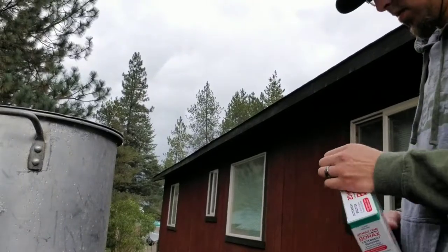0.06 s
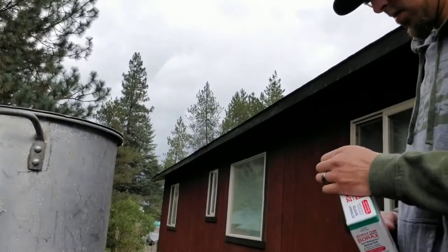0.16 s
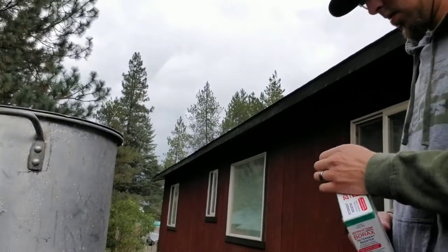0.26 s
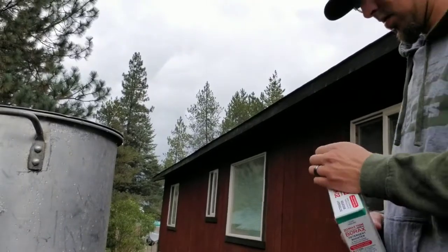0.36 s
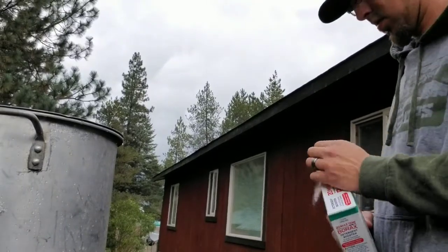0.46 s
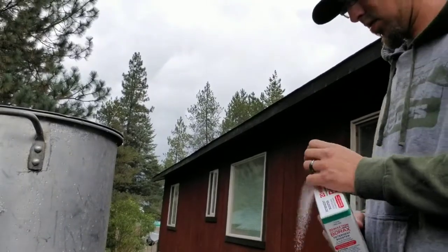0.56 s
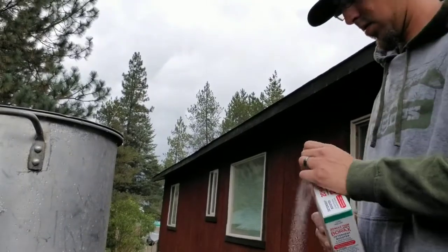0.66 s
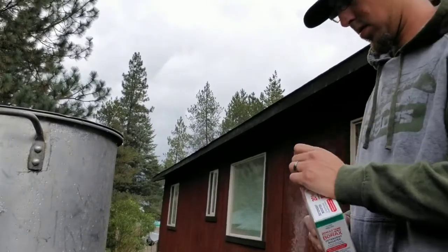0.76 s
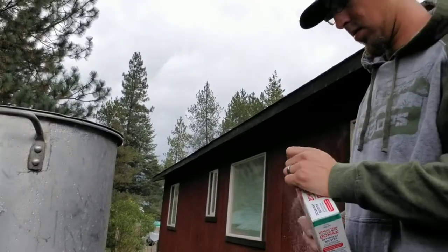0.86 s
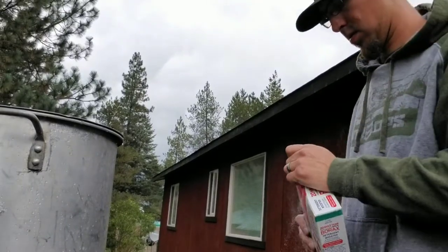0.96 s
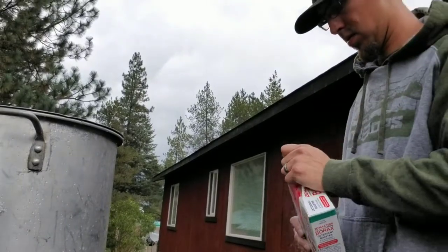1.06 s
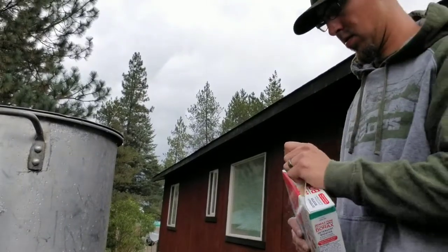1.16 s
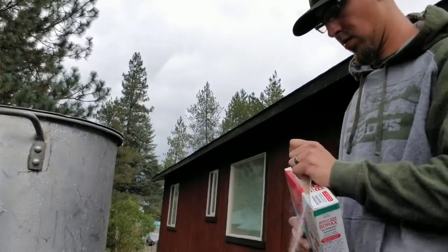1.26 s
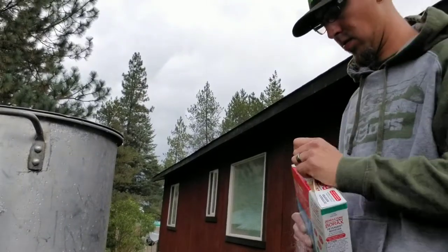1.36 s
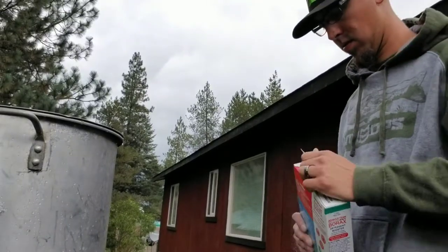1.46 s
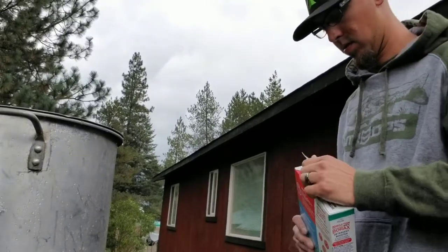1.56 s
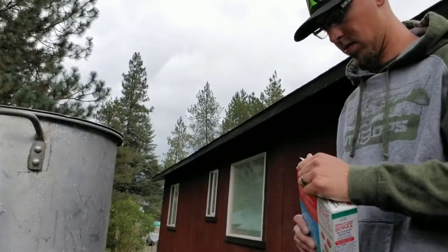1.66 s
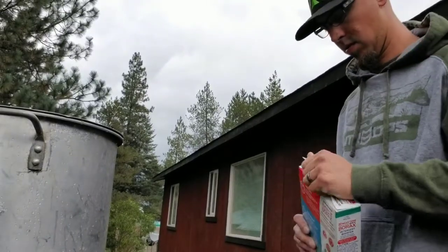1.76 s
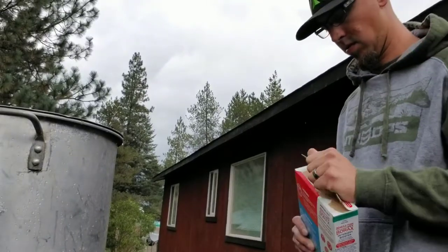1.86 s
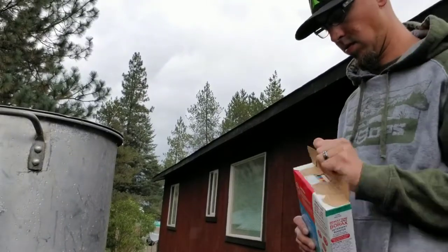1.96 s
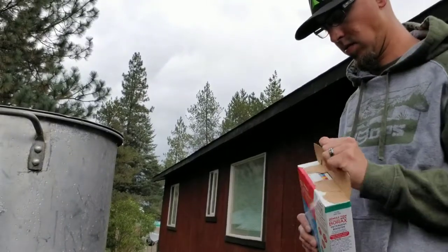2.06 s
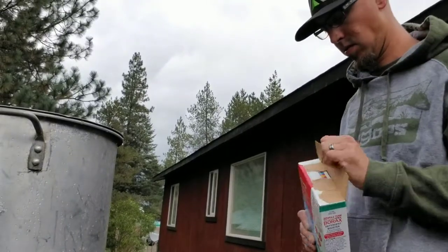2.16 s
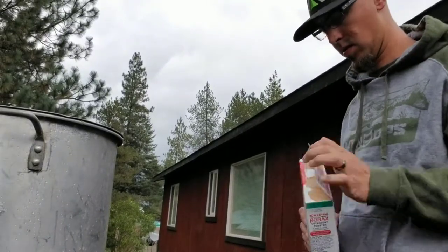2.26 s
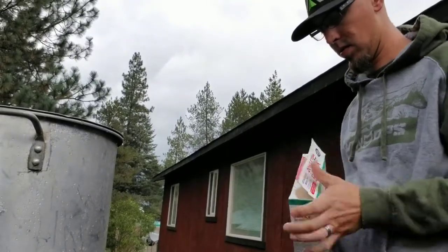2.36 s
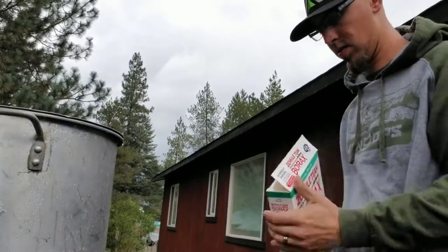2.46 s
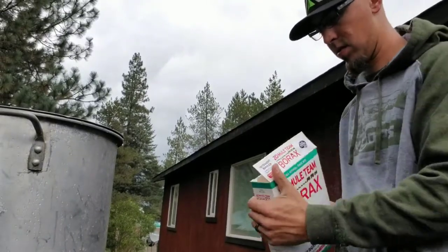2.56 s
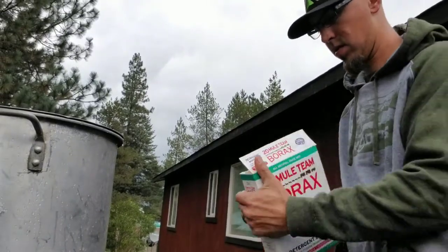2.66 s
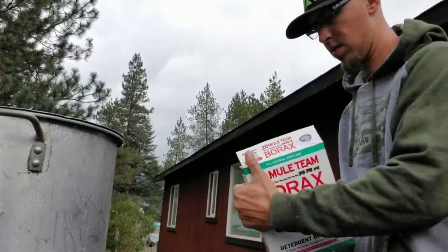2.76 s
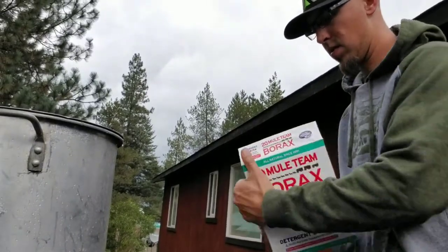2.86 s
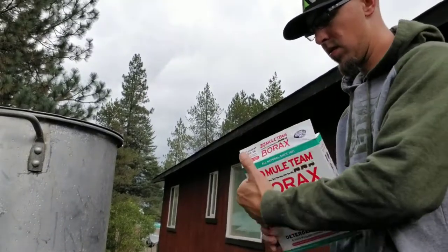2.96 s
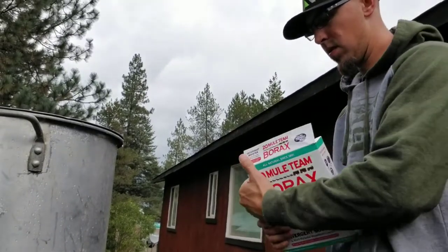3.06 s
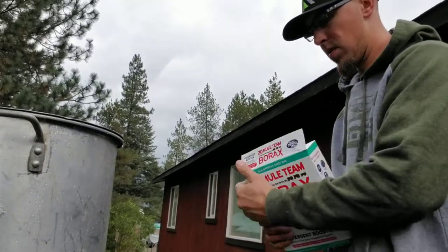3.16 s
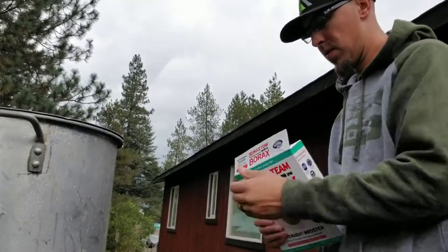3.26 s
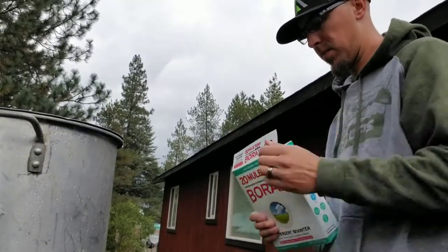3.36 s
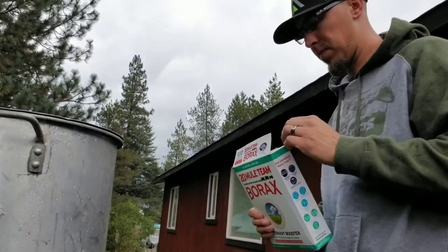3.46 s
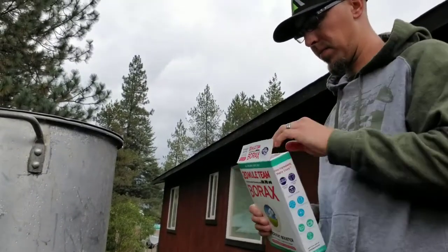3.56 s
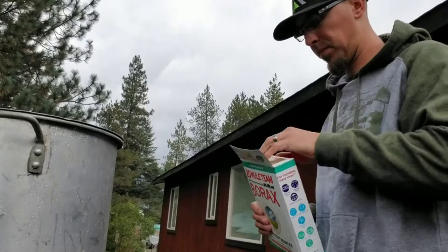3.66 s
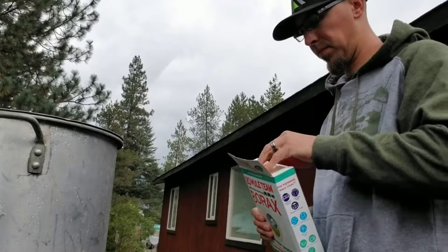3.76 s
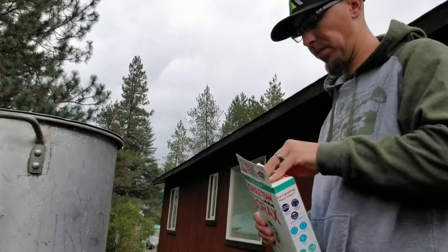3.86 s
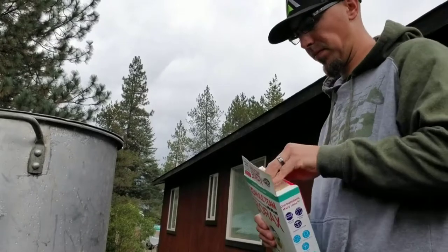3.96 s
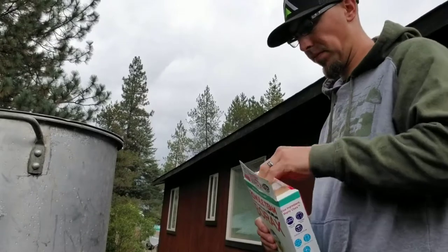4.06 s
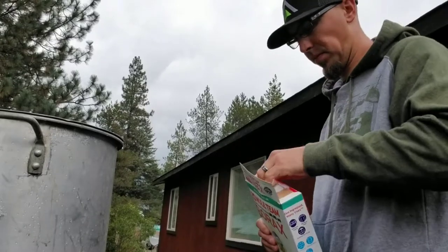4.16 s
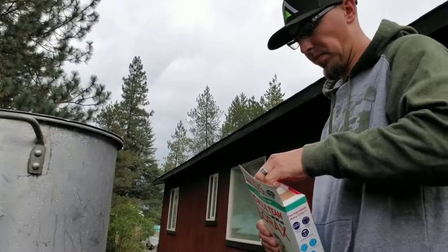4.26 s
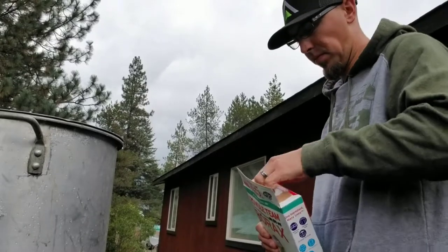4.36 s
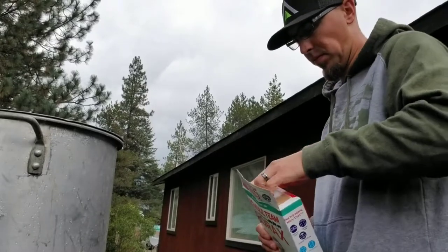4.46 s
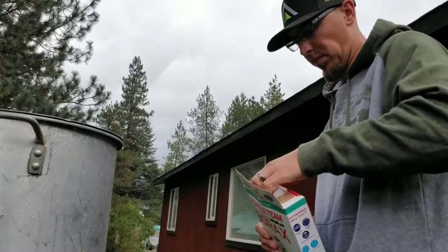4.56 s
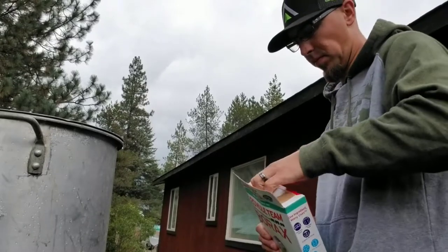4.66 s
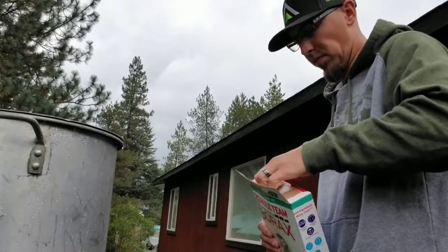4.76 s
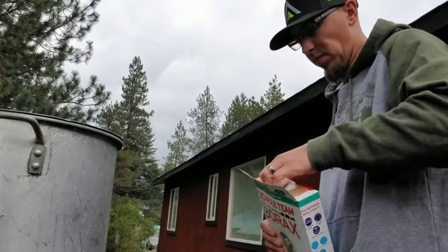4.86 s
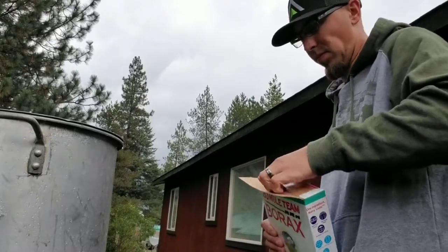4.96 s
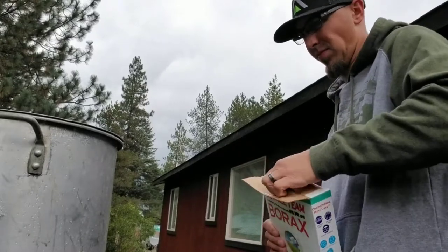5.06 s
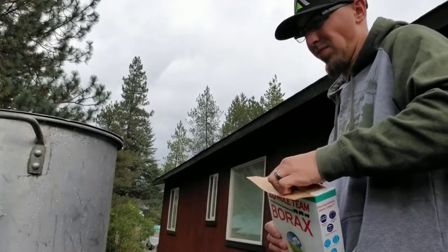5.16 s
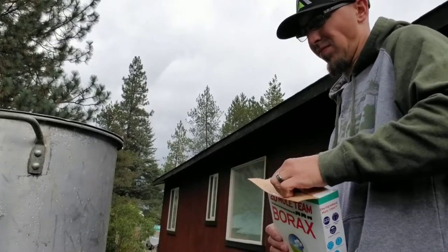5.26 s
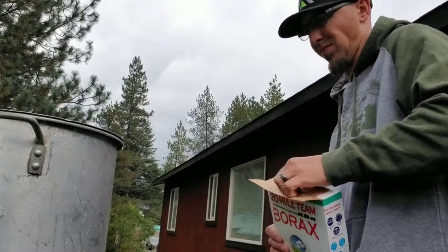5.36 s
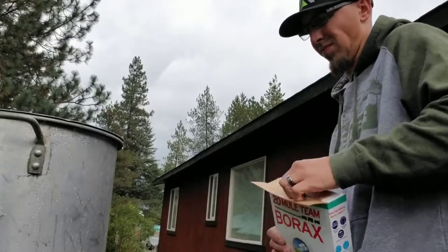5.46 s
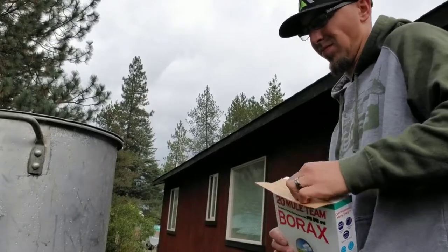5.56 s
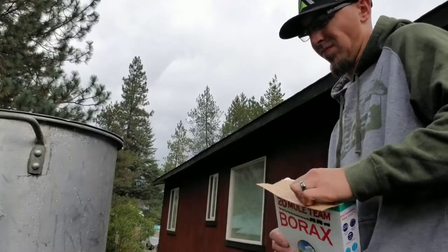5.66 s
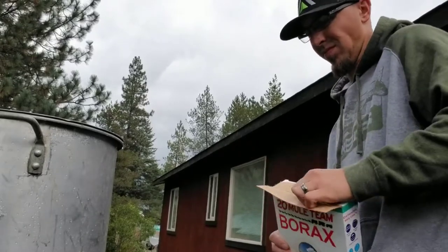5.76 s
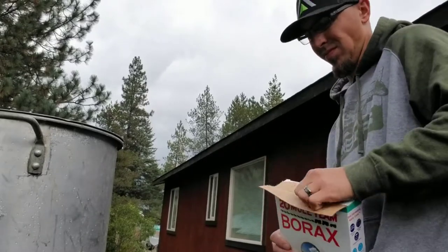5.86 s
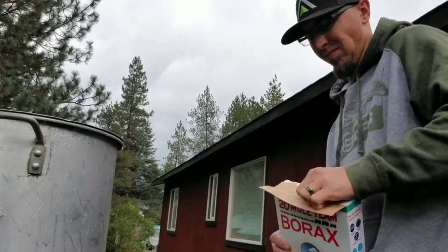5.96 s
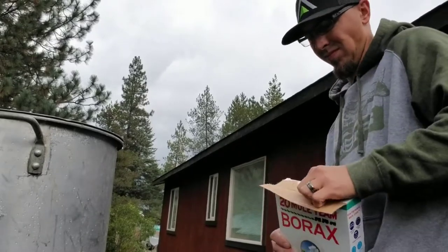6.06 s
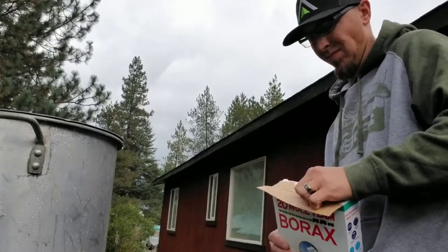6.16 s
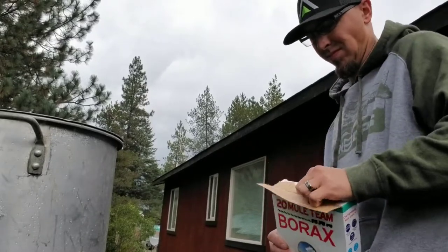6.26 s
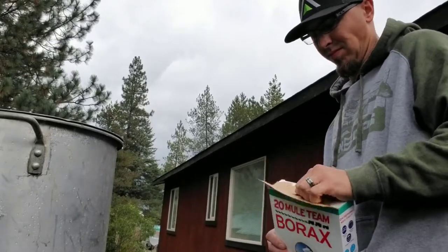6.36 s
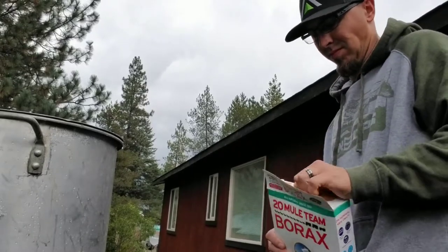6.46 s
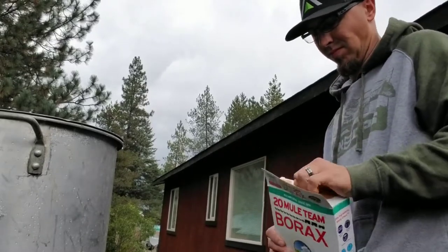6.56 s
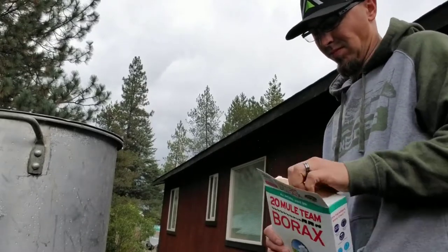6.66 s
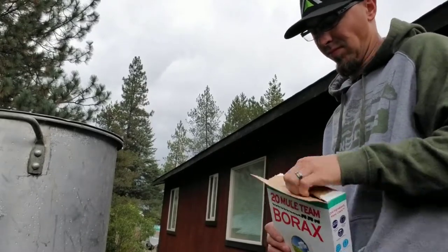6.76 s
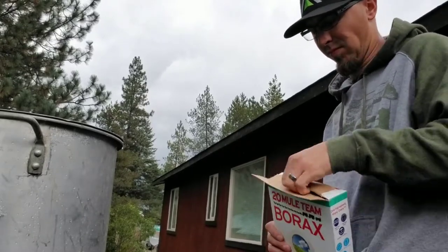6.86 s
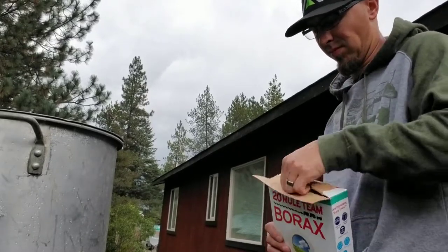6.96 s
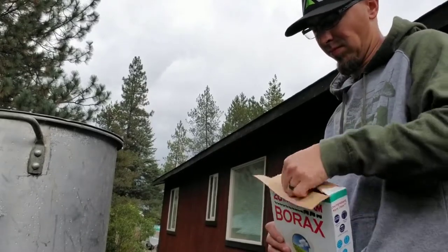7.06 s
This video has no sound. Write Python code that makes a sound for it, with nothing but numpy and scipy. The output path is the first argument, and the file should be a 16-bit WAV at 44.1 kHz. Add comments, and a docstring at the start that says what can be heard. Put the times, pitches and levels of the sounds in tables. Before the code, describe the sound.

Dry cardboard handling, heard near and with little echo outdoors. Crisp rubs and snapping creases come first, then a short coarse tear of glued board. Handling drops to sparse faint touches before renewed scratchy strokes on an inner flap. A low stuttering rub leads to a hard hollow pop, and light scrapes and bumps finish. Soft breeze rumble and faint simmering from a large metal pot continue beneath.

```python
"""In a yard beside a house a large metal pot simmers faintly, under a lumpy breeze, as a washing powder carton is handled.
From the start short friction strokes rub it: slips drive its stiff board, hollow box and hissing fibres.
Soon creases crack as decaying noise bursts and panels knock as short pushes that ring the box.
At 1.74 s the lid tears off its glue in one long rip; more strokes work the inner flap loose.
At 5.74 s a fingertip judders by stick-slip; from 6.48 s the flap pops through in loud knocks and cracks."""
import sys
import numpy as np
from scipy import signal
from scipy.io import wavfile

SR = 44100
rng = np.random.default_rng(int(sys.argv[2]) if len(sys.argv) > 2 else 0)


def wav_record(signal):
    """Record a signal, one row per channel, as 16-bit PCM in the file named by sys.argv[1]."""
    frames = np.transpose(np.atleast_2d(signal))
    bounded = np.clip(frames, -1, 1)
    # unit amplitude maps onto the largest positive 16-bit level
    quanta = np.round(bounded * 32767).astype(np.int16)
    wavfile.write(sys.argv[1], SR, quanta)


N = 313548
TIME = np.arange(N) / SR

# All levels are those at the source, before small trims and the yard's reflections.
# breeze on the microphone: start_s, level_db
BREEZE_CURVE = [(0.0, -61), (.4, -53), (1.05, -54.5), (1.4, -64), (3.9, -59.5), (4.4, -55.5), (5.5, -56),
                (6.2, -52), (6.9, -57), (7.11, -44.5)]
# resonances of the air in the pot: pitch_hz, width_hz, level_db
POT_MODES = [(610, 42, -11), (955.4, 35, 9), (2006, 140, -6.5), (2070, 170, -17.5), (2800, 140, -12),
             (4130, 500, -22)]
# boost of the pot's upper ring: start_s, gain_db
POT_UPPER_CURVE = [(0.0, 1), (2.5, -1), (2.6, 6.5), (7.11, 4)]
POT_UPPER_HZ, POT_UPPER_WIDTH_HZ = 1980, 450

# resonances of the hollow box: pitch_hz, width_hz, level_db
BOX_MODES = [(189.4, 76, -0.5), (273.7, 51.5, 2.5), (320.6, 24, 1), (467, 48, -1), (579, 99, -2.5),
             (627, 86, 0.5), (733, 77, -12), (860, 180, -7.5)]
# resonances of the stiff board: pitch_hz, width_hz, level_db
BOARD_MODES = [(734, 200, -5.5), (1460, 313, 0.5), (1633, 370, 3), (1842, 242, 3), (2171, 183, -2.5),
               (2530, 300, -1.5), (3220, 660, -2), (4044, 520, -0.5), (4550, 595, 1), (6290, 1700, -5.5)]
# freedom of the flap in hand, lifted to ring or pressed to damp: start_s, ring_db, pitch_hz
FLAP_CURVE = [(0.0, 2, 1680), (1.15, 0.5, 1660), (1.45, 6.5, 1770), (1.68, 5, 1660), (1.95, -0.5, 1760),
              (2.7, 6, 2080), (4.15, 4, 1980), (4.7, 8.5, 1970), (5.0, 5, 1910), (5.5, 6, 1790),
              (6.3, -2, 1760), (6.54, 5.5, 1980)]
FLAP_OCTAVES = .27   # spread of its bending modes around its pitch

# faint shifting of the hands between strokes, as scrape on the board: start_s, scrape_db
SHIFTING_CURVE = [(0.0, -55.5), (.8, -53), (1.35, -57.5), (1.7, -61), (2.12, -72), (2.38, -89),
                  (2.55, -63.5), (3.2, -72.5), (3.8, -65), (4.1, -55), (4.8, -54.5), (5.45, -62.5),
                  (6.3, -56), (7.11, -62)]
SHIFT_PUSH_DB, SHIFT_FIBRE_DB = -2.5, -5   # re scrape
SHIFT_WAVER_DB, SHIFT_WAVERS_PER_S = 1, 18
# a finger or flap slides over the carton:
# start_s, length_s, scrape_db, swell_db (start to end), push_db (box, re scrape), fibre_db (re scrape)
STROKES = [(0.0, .15, -57, 0, -4.5, 11), (0.139, 0.063, -41, 14, -19, -0.5),
           (0.256, 0.0904, -33, -7, -6, -5), (0.323, 0.096, -46, -10, -2, -7.5),
           (0.511, 0.28, -67.5, -8.5, 2.5, 8), (.648, 0.14, -43, -22.5, 1, -13.5),
           (0.853, 0.15, -45, 4, -10, 3), (0.965, .13, -37.5, -6, -9.5, 1.5),
           (1.12, 0.13, -47.5, -8.5, -7.5, 8), (1.4, 0.18, -50.5, -5, -3, -3),
           (1.586, 0.12, -57, 4, -17.5, -0.5), (2.182, 0.027, -48, -1, -9.5, -6),
           (2.419, .11, -59.5, 0, -4.5, -3.5), (2.731, .115, -63, 4, -5, -15),
           (3.623, 0.054, -51, 11, -11, -7), (3.85, 0.047, -54.5, -4, 1.5, -6),
           (3.998, 0.086, -54.5, -11, -2, -6), (4.084, 0.16, -43.5, -1.5, -32, -5),
           (4.345, 0.279, -43, -3.5, -14, -5), (4.629, 0.11, -41.5, -6, -40, -4.5),
           (4.885, 0.058, -46, 5, -7, -1.5), (4.948, 0.045, -40.5, -1.5, -1, 0),
           (5.007, 0.13, -55, -6.5, -19, -4.5), (5.193, .08, -63, 13.5, 12.5, -4.5),
           (5.352, .04, -50, 1.5, -1, -8), (5.612, 0.17, -63.5, -8.5, 9, 3.5),
           (5.746, .18, -48.5, 2, -5, -11.5), (5.956, 0.053, -46, -4.5, 0, -1),
           (6.123, .2, -56.5, -1.5, 7.5, -2), (6.325, 0.1, -46.5, 0.5, 3.5, -5),
           (6.428, 0.057, -42, 12.5, 0.5, 2.5), (6.53, 0.038, -37.5, -9, 1, -12),
           (6.569, 0.13, -64, 6, 13, -19), (6.728, 0.057, -55, 8.5, 1, -5),
           (6.852, 0.022, -49, -0.5, -3.5, -2.5), (6.939, 0.028, -54, 3, 1.5, -6.5),
           (7.021, 0.068, -52.5, -10, 5.5, -11)]
STROKE_ATTACK_S, STROKE_RELEASE_S = 0.015, 0.02
# the lid tears off its glue: start_s, push_db (box), scrape_db (board), fibre_db (hiss)
RIP_CURVE = [(1.74, -88, -79, -62), (1.784, -63, -48, -47.5), (1.806, -43.5, -36.5, -34),
             (1.892, -53, -40, -36), (1.966, -49.5, -37.5, -30), (2.008, -47, -36.5, -40),
             (2.07, -67.5, -70, -74.5)]
RIP_GAIN_DB = 3.5   # on all three columns
# hardness is hiss over push: a hard edge favours the upper modes, soft skin the lower ones
SLIDE_TILT_DB, TILT_PER_HARDNESS = -3.5, 0.14   # dB per octave; the same per dB of hardness
HAND_DAMPING = 1.5    # a rubbing hand widens the box modes by this factor
SKIN_TILT_DB = -1     # dB per octave: a soft hand favours the low box modes

# glue and creases giving way: start_s, board_db, fibre_db, decay_s
CRACKS = [(.157, -35.5, -35, .0013), (0.179, -47, -21.5, .00085), (0.318, -16.5, -22, 0.0017),
          (.528, -69, -44.5, .0035), (0.654, -37.5, -38.5, 0.013), (.919, -52, -27.5, 0.0011),
          (.961, -37.5, -29.5, .0018), (1.004, -30, -23.5, 0.0012), (1.0114, -38, -30, 0.0017),
          (1.0444, -48, -24.5, 0.001), (1.0629, -25.5, -35, 0.0013), (1.118, -55, -27.5, 0.00058),
          (1.1348, -31.5, -23.5, 0.00079), (1.4459, -38.5, -60, 0.0059), (1.4915, -37, -54, 0.0037),
          (1.54, -45, -72, 0.0031), (1.6461, -36, -42, 0.0025), (1.8047, -29.5, -34, .0035),
          (1.923, -48, -36, 0.0012), (1.9854, -34, -40, 0.0009), (2.422, -56, -62, 0.0036),
          (2.445, -65, -52, 0.00092), (2.497, -49.5, -57, .0017), (3.35, -60, -62, 0.0014),
          (3.8118, -64, -49, .0013), (4.357, -48, -47, 0.0013), (4.7233, -41, -40, 0.003),
          (4.769, -40.5, -44.5, 0.00083), (4.916, -41, -45, .0014), (4.9423, -28.5, -33, 0.0029),
          (4.9683, -33, -32, 0.0022), (5.708, -70, -43, 0.001), (6.479, -28.5, -22, 0.0028),
          (6.517, -41, -28.5, .0008), (6.5253, -37, -35, 0.0021), (6.54, -16, -27, 0.0008),
          (6.559, -30.5, -29, 0.0022), (6.677, -51, -50, 0.006)]
CRACK_TILT_DB, CRACK_TILT_PER_HARDNESS = -4, 0.092   # dB per octave; the same per dB of fibre over board
# small creases giving way at random while the board is rubbed
TICKS_PER_S, TICK_RATE_FOLLOWS = 5, .7   # at the mean hiss level in dB; share of its swing
TICK_DB, TICK_SPREAD_DB, TICK_S = -6, 7, 0.00074   # re the rubbing at that moment; decay time
# panels buckling or being bumped: start_s, level_db, pitch_hz (centre of the push)
KNOCKS = [(.275, -40.5, 400), (.319, -34, 680), (.655, -43, 380), (1.003, -39, 258), (1.063, -30, 571),
          (1.446, -42.5, 208), (1.496, -44.5, 231), (2.479, -53.5, 248), (3.872, -55, 254),
          (4.01, -44, 426), (4.255, -54, 260), (4.728, -39.5, 275.5), (4.969, -34.5, 790),
          (5.915, -42, 186), (5.96, -49.5, 254), (6.326, -41, 186), (6.4808, -16.5, 270),
          (6.5402, -28.5, 753), (6.559, -27.5, 720), (6.883, -44.5, 263), (7.029, -37.5, 240),
          (7.059, -42, 262)]
# a fingertip sticking and slipping on the flap: start_s, slips_per_s, level_db
JUDDER_CURVE = [(5.74, 80, -48), (5.78, 125, -50), (5.82, 133, -46.5), (5.86, 142, -47.5), (5.89, 120, -46),
                (5.93, 120, -58)]

PORT_LAG_S = 5 / SR   # arrival at the right port after the left
CUTOFF_HZ = 16000


def from_db(db):
    """Amplitude ratio: 20 dB is a factor of ten."""
    return 10 ** (np.asarray(db) / 20)


def rms_one(x):
    """Normalise to unit root mean square over all channels."""
    return x / np.sqrt(np.mean(x ** 2) + 1e-20)


def at_level(x, db, span_s):
    """Scale a blow so that its first span_s seconds have the given rms level."""
    return from_db(db) * x / np.sqrt(np.mean(x[..., :int(span_s * SR)] ** 2))


def in_time(rows):
    """Linear interpolation of each column of a curve at every sample."""
    s, *columns = np.transpose(rows)
    return [np.interp(TIME, s, c) for c in columns]


def add(out, s, sound):
    """Superposition: mix a sound in from time s."""
    start = int(s * SR)
    out[..., start:start + sound.shape[-1]] += sound[..., :N - start]


def drift(rate):
    """Slow random wandering: straight lines between knots of spread 1, rate knots per second."""
    knots = rng.standard_normal(N // 20)
    return np.interp(TIME * rate, np.arange(len(knots)), knots)


def stereo_noise(alike, size=N):
    """Partial coherence: mid and side white noise give a chosen left-right likeness."""
    mid, side = rng.standard_normal((2, size))
    alike = np.clip(alike, 0, 1)
    return (np.sqrt(1 + alike) * mid + np.sqrt(1 - alike) * side * [[1], [-1]]) / np.sqrt(2)


def band(x, low_hz, high_hz, order=2):
    """Band-pass filtering between two corner frequencies."""
    sos = signal.butter(order, [low_hz, high_hz], "band", fs=SR, output="sos")
    return signal.sosfilt(sos, x)


def bell(x, hz, width_hz, gain_db):
    """Resonant equalisation: raise or lower one region of the spectrum."""
    region = signal.lfilter(*signal.iirpeak(hz, hz / width_hz, fs=SR), x)
    return x + (from_db(gain_db) - 1) * region


def resonate(x, modes):
    """Modal superposition: parallel damped resonances of alternating sign."""
    out = 0
    for k, (hz, width, db) in enumerate(modes):
        r = np.exp(-np.pi * width / SR)   # pole radius sets the damping
        poles = [1, -2 * r * np.cos(2 * np.pi * hz / SR), r * r]
        ring = (1 - r * r) / 2 * signal.lfilter([1, 0, -1], poles, x + 1e-18)
        out = out + (-1) ** k * from_db(db) * ring
    return out


def background():
    """Filtered noise: air modes colour the pot's simmer, bands shape the open air's hush and the breeze."""
    pot = from_db(-63.5 + 0.27 * drift(23)) * rms_one(resonate(stereo_noise(0.26), POT_MODES))
    pot = bell(pot * from_db([[1.6], [-1.6]]), POT_UPPER_HZ, POT_UPPER_WIDTH_HZ, in_time(POT_UPPER_CURVE)[0])
    hush = from_db(-70.0) * rms_one(band(stereo_noise(.7), 140, 230, order=1))
    hiss = from_db(-69.0) * rms_one(band(stereo_noise(0.15), 1800, SR / 2 - 1, order=1))
    breeze_db, = in_time(BREEZE_CURVE)
    lumps = from_db(breeze_db - .5 + 2.2 * drift(14))
    breeze = lumps * rms_one(band(stereo_noise(.7), 40, 120, order=3))
    return pot + hush + hiss + breeze * from_db([[1.1], [-1.1]])


def shifting_power():
    """Sliding friction of restless hands: powers of box push, board scrape and fibre hiss."""
    scrape_db = in_time(SHIFTING_CURVE)[0] + SHIFT_WAVER_DB * drift(SHIFT_WAVERS_PER_S)
    return np.outer(from_db([SHIFT_PUSH_DB, 0, SHIFT_FIBRE_DB]), from_db(scrape_db)) ** 2


def stroke_envelope(s, length_s, swell_db):
    """Onset and decay of friction: a slide takes hold, swells or slackens evenly in dB, and dies away."""
    t = TIME - s
    attack = np.clip(t / STROKE_ATTACK_S, 0, 1)
    swell = from_db(swell_db * (np.clip(t / length_s, 0, 1) - .5))
    release = np.exp(-np.clip((t - length_s) / STROKE_RELEASE_S, 0, 20))
    return attack * swell * release


def strokes_power():
    """Sliding friction in short strokes: powers of box push, board scrape and fibre hiss."""
    power = np.zeros((3, N))
    for s, length_s, db, swell_db, push_db, fibre_db in STROKES:
        peaks = from_db([db + push_db, db, db + fibre_db])
        power += np.outer(peaks ** 2, stroke_envelope(s, length_s, swell_db) ** 2)
    return power


def rip_power():
    """Progressive tearing along the glue: powers of box push, board scrape and fibre hiss."""
    tearing = (TIME > RIP_CURVE[0][0]) & (TIME < RIP_CURVE[-1][0])
    return tearing * from_db(np.array(in_time(RIP_CURVE)) + RIP_GAIN_DB) ** 2


def friction():
    """Incoherent sources add in power; returns the levels in dB of push, scrape and hiss."""
    return 10 * np.log10(shifting_power() + strokes_power() + rip_power())


def grains(per_s, spread_db, length_s):
    """Shot noise: envelope of tiny uneven slips at random moments; the denser, the smoother; rms 1."""
    sizes = from_db(spread_db * np.minimum(rng.exponential(1, N), 4))
    energy = (rng.random(N) < per_s / SR) * sizes ** 2 / per_s
    decaying = signal.lfilter([1], [1, -np.exp(-1 / (length_s * SR))], energy + 1e-18)
    return rms_one(np.sqrt(decaying))


def fibre_hiss(x):
    """Small radiators favour short waves: snapping fibres give only treble."""
    return bell(band(x, 5400, SR / 2 - 1, order=3), hz=13500, width_hz=10000, gain_db=-1.3)


def board(x, ring_db, flap_hz, tilt_db, wander_db):
    """Plate modes: a free flap boosts those near its pitch, hardness tilts them, touch varies each one."""
    modes = []
    for (hz, width, db), wander in zip(BOARD_MODES, wander_db):
        octaves = np.log2(hz / flap_hz)
        flap_boost_db = ring_db * np.exp(-(octaves / FLAP_OCTAVES) ** 2)
        modes.append((hz, width, db + flap_boost_db + tilt_db * octaves + wander))
    power = sum(width * from_db(db) ** 2 for hz, width, db in modes)
    return band(resonate(x, modes) / np.sqrt(power), 650, 7500)


def rubbing(box_db, board_db, fibre_db):
    """Friction as random slips, denser with more hiss, driving box, board and fibres; snags tick only the surface."""
    speed = np.clip(from_db(.4 * (fibre_db + 48)), .6, 2.5)
    fine = grains(per_s=3200 * speed, spread_db=3.0, length_s=0.0003) * from_db(1.11 * drift(80))
    snags = grains(per_s=140 * speed, spread_db=4.0, length_s=0.00021)
    slips = np.hypot(fine, 0.21 * snags)

    box_modes = []
    for hz, width, db in BOX_MODES:
        skin_db = SKIN_TILT_DB * np.log2(hz / BOX_MODES[0][0])
        box_modes.append((hz, width * HAND_DAMPING, db + skin_db + 5.0 * drift(15)))
    push = np.hypot(fine, 1) * stereo_noise(0.86)   # soft skin evens out the push
    box = rms_one(band(resonate(push, box_modes), 91, 2400))

    tilt_db = SLIDE_TILT_DB + TILT_PER_HARDNESS * (fibre_db - box_db)
    wander_db = [3 * drift(28) for mode in BOARD_MODES]
    scrape = rms_one(board(slips * stereo_noise(0.49), *in_time(FLAP_CURVE), tilt_db, wander_db))
    fibres = rms_one(fibre_hiss(slips * stereo_noise(0.16)))
    surface = scrape * from_db(board_db - 2.0) + fibres * from_db(fibre_db + 3.0)
    return box * from_db(box_db), surface


def small_cracks(board_db, fibre_db):
    """Random breakage: ticks grow stronger and more frequent with the rubbing; rows as in CRACKS."""
    per_s = TICKS_PER_S * from_db(TICK_RATE_FOLLOWS * (fibre_db - fibre_db.mean()))
    moments = np.flatnonzero(rng.random(N) < per_s / SR)
    levels_db = TICK_DB + TICK_SPREAD_DB * rng.standard_normal(N)
    return [(i / SR, board_db[i] + levels_db[i], fibre_db[i] + levels_db[i], TICK_S) for i in moments]


def cracks(breaks, size=4096):
    """Impulsive excitation: an avalanche of snapping fibres rises fast and decays exponentially."""
    out, t = np.zeros((2, N)), np.arange(size) / SR
    flap = np.array(in_time(FLAP_CURVE))
    for s, board_db, fibre_db, decay_s in breaks:
        envelope = np.exp(-t / decay_s) * (1 - np.exp(-t / 0.0011))
        burst = stereo_noise(0.22, size=size) * envelope
        tilt_db = CRACK_TILT_DB + CRACK_TILT_PER_HARDNESS * (fibre_db - board_db)
        wander_db = 2 * rng.standard_normal(len(BOARD_MODES))
        ring = board(burst, *flap[:, int(s * SR)], tilt_db, wander_db)
        add(out, s, at_level(ring, board_db + 0.5, span_s=0.0063))
        add(out, s, at_level(fibre_hiss(burst), fibre_db + 2.0, span_s=0.0058))
    return out


def knocks(size=8192):
    """Buckling: a short push and pull rings the box modes near its pitch; slow flips are mostly push."""
    out, t = np.zeros(N), np.arange(size) / SR
    for s, db, hz in KNOCKS:
        push = band(-np.sin(2 * np.pi * hz * t) * np.exp(-(t * hz / 2.0) ** 2), 170, 1000)
        modes = []
        for f, width, level in BOX_MODES:
            modes.append((f, width, level - 5 * abs(np.log2(f / hz)) + 2 * rng.standard_normal()))
        ring = resonate(np.exp(-t * hz * 12), modes)
        blow = rms_one(push) - hz / 310 * rms_one(ring)
        add(out, s, at_level(blow, db + 0.27, span_s=0.014))
    return out


def judder():
    """Stick-slip friction: nearly regular slips ring one box mode, and each ticks the board."""
    per_s, db = in_time(JUDDER_CURVE)
    cycles = np.floor(np.cumsum(per_s * (1 + .025 * drift(150))) / SR)
    touching = (TIME > JUDDER_CURVE[0][0]) & (TIME < JUDDER_CURVE[-1][0])
    slips = np.diff(cycles, prepend=0) * from_db(1.1 * drift(260)) * touching
    sound = resonate(slips, [(259, 38, 0)]) + from_db(-24.5) * resonate(slips, BOARD_MODES)
    return from_db(db) * sound / np.std(sound[touching])


def yard(x, near_db, far_db, size=16384):
    """Reflection: quick echoes off hands, chest and pot, then a faint dull tail from house wall and trees."""
    t = np.arange(size) / SR
    # each decays by 60 dB in 0.053 s and 0.16 s
    near = rng.standard_normal((2, size)) * from_db(-60 * t / 0.053) * (t > .0012)
    dull = band(rng.standard_normal((2, size)), 210, 10500, order=1)
    far = dull * from_db(-60 * t / 0.16) * (t > .008)
    echo = (from_db(near_db) * rms_one(near) + from_db(far_db) * rms_one(far)) / np.sqrt(size)
    echo[:, 0] = 1   # direct path
    return signal.fftconvolve(x, echo / np.sqrt(np.sum(echo ** 2) / 2), axes=1)[:, :N]


def scene():
    """Propagation: the right port hears the carton later; deep tones come almost only by the direct path."""
    outdoors = background()
    box_db, board_db, fibre_db = friction()
    box, surface = rubbing(box_db, board_db, fibre_db)
    snaps = cracks(list(CRACKS) + small_cracks(board_db, fibre_db))
    low = yard(box + knocks() + judder(), near_db=-16, far_db=-19)
    high = yard(surface + snaps, near_db=-4.5, far_db=-17) * from_db([[.8], [-.8]])
    left, right = low + high
    late_right = np.interp(TIME - PORT_LAG_S, TIME, right)
    return np.array([left, late_right]) + outdoors


def record(dry):
    """Port resonance: the microphone has a dip in the treble and a peak above it; the top is cut."""
    dipped = bell(dry, hz=8430, width_hz=2540, gain_db=-9.5)
    dipped = bell(dipped, hz=10000, width_hz=3500, gain_db=-4.0)
    coloured = bell(dipped, hz=15300, width_hz=2200, gain_db=2.5)
    low_pass = signal.ellip(10, .2, 70, CUTOFF_HZ, fs=SR, output="sos")
    return signal.sosfilt(low_pass, coloured)


dry = scene()
out = record(dry)
wav_record(out)
```